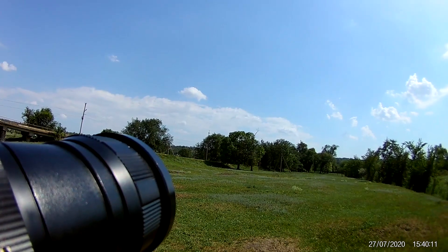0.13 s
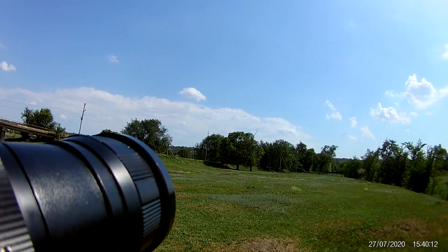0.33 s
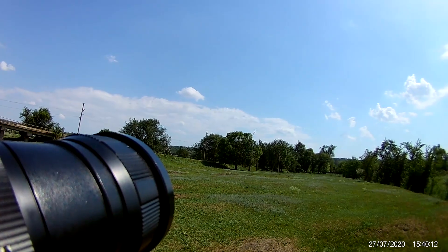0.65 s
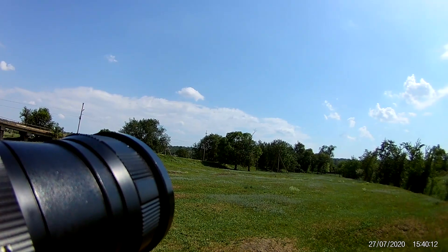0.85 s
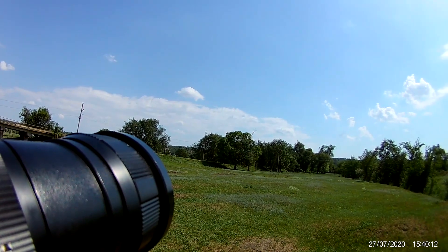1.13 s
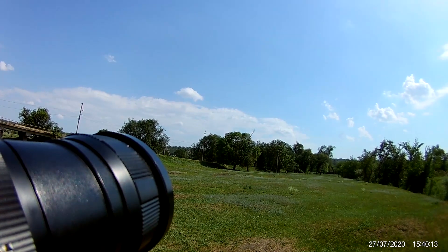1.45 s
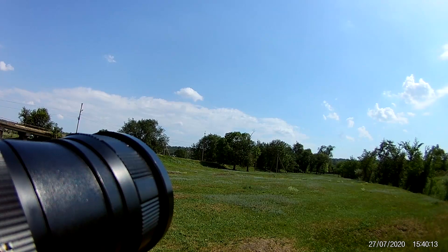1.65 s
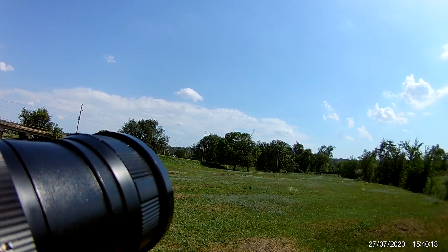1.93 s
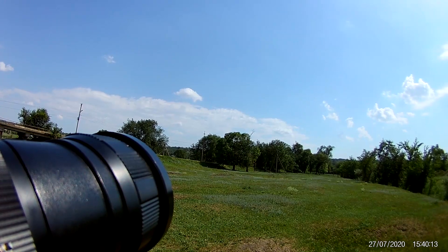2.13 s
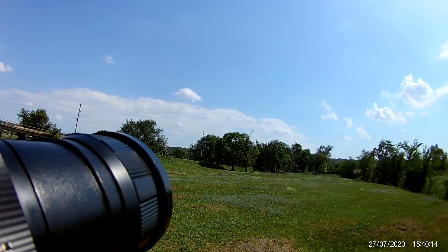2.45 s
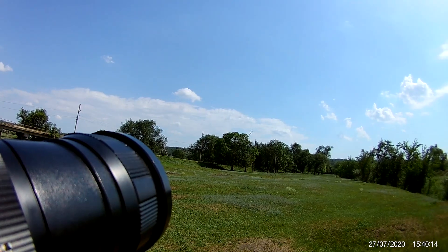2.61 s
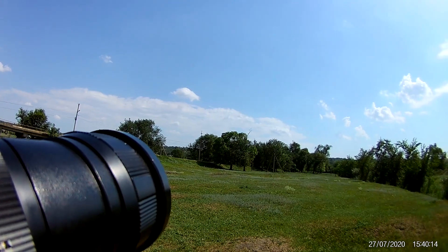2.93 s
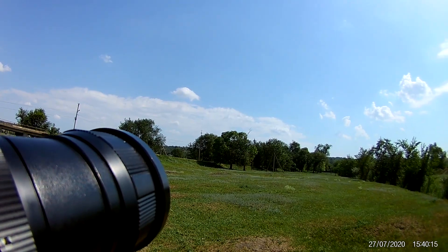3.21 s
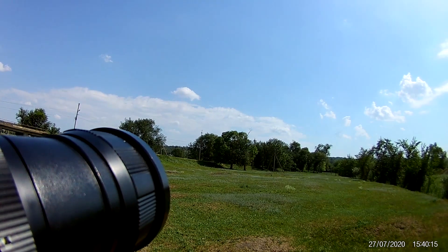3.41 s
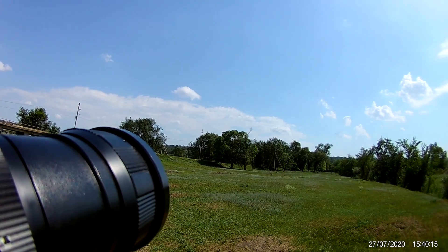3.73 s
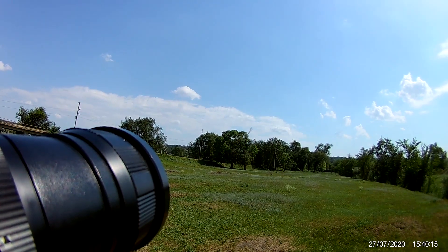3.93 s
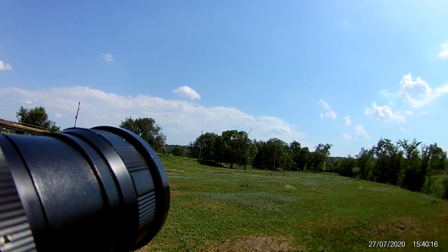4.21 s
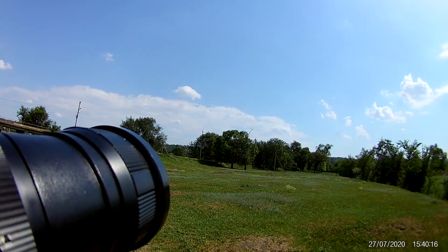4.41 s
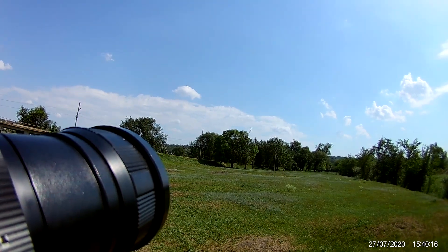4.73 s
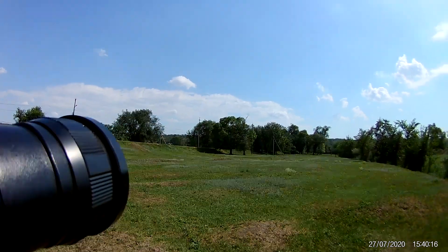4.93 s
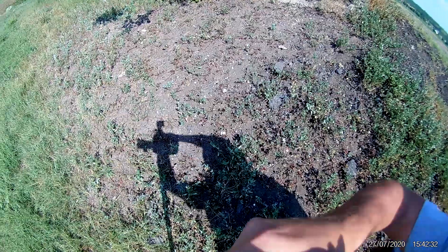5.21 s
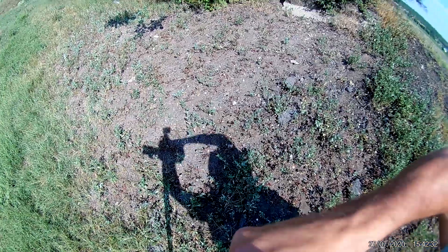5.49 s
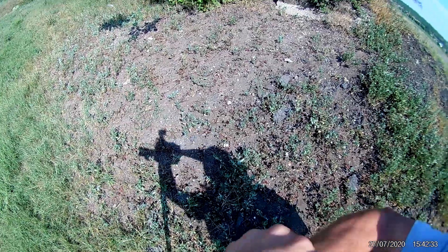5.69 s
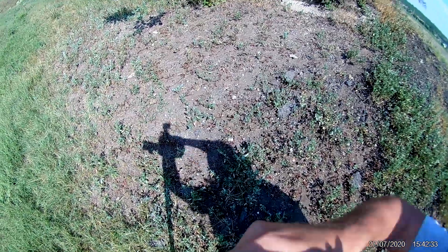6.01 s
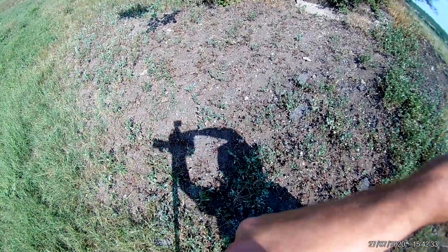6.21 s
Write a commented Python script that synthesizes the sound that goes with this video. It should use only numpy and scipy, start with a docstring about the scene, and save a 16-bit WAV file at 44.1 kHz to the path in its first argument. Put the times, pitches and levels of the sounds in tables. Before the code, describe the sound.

In a quiet open field, very close to the microphone, a few light lever clicks start a clockwork film camera. It whirrs with a fast, rough metallic clatter and faint gear whine for over three seconds, then stops dead with a hard clack and small trailing clicks. A low breeze rumbles gently. Abruptly, hands rub and bump the camera, a quick ratchet runs, and sharp metal snaps follow.

```python
"""A clockwork film camera, close to the microphone, in an open field with a light breeze.
The release is pressed, the motor whirrs at about 24 frames a second and is stopped dead by its latch:
contacts in every frame, rough gear teeth and a scraping governor excite the metal housing; gears sing.
Then the camera is handled and wound: rubbing and bumps, a run of ratchet teeth, sharp snaps of the key.
The breeze is shaped noise with gusts, over the faint hiss of the field."""
import sys
import numpy as np
from scipy import signal
from scipy.fft import rfft, irfft, next_fast_len
from scipy.io import wavfile

SR = 44100
rng = np.random.default_rng(int(sys.argv[2]) if len(sys.argv) > 2 else 0)


def transcribe(signal):
    """Save signal, clipped to [-1, 1], as a 16-bit WAV file at the path in sys.argv[1]."""
    frames = np.atleast_2d(signal).T
    limited = np.clip(frames, -1, 1)
    pcm = np.round(limited * 32767).astype(np.int16)
    wavfile.write(sys.argv[1], SR, pcm)


N = 280035  # length in samples

# broad spectrum of the metal housing: (frequency [Hz], level [dB])
HOUSING = [(130, -31), (210, -15.5), (290, -21.5), (400, -8.5), (700, -8.5), (1400, -9), (2000, -5),
           (3400, -6), (3700, -10.5), (4500, -13), (5500, -10.5), (8400, -10), (9400, -18.5),
           (10700, -28.5), (15500, -34.5)]
# resonances and antiresonances of the housing: (frequency [Hz], width [Hz], gain [dB])
HOUSING_MODES = [(468, 80, 2), (735, 50, -7), (1165, 70, 7), (1570, 30, -7), (1800, 90, 3), (2070, 60, -4),
                 (2180, 130, 6), (2350, 160, 4), (2560, 120, 4), (2700, 120, -5), (2890, 110, 5),
                 (2990, 70, -6), (3150, 200, 6), (3370, 190, 6), (3630, 100, -4), (4480, 200, -4),
                 (5200, 300, -3), (5640, 200, 4), (6100, 200, -5), (6400, 300, 3), (8220, 400, 4),
                 (8550, 250, -4)]
# the claw bites hardest at the start of each sprocket turn
FRAMES_PER_TURN = 4


def from_db(db):
    """Amplitude factor of a level in dB."""
    return 10 ** (np.asarray(db) / 20)


def rms_one(x):
    """Scale to an rms of 1."""
    return x / np.sqrt(np.mean(x ** 2) + 1e-20)


def at_hz(points, hz):
    """Read a spectrum on a log-frequency axis."""
    known_hz, db = np.transpose(points)
    return np.interp(np.log(np.maximum(hz, 1)), np.log(known_hz), db)


def drift(rate_hz):
    """Slow random wander of rms 1: noise through a double low-pass, computed at every tenth sample."""
    pole = np.exp(-20 * np.pi * rate_hz / SR)
    raw = rng.standard_normal(N // 10 + 4002)
    slow = signal.lfilter([1], [1, -2 * pole, pole * pole], raw)[4000:]  # settled part
    return np.interp(np.arange(N) / 10, np.arange(len(slow)), rms_one(slow))


def colour(x, spectrum, modes=(), tilt_db=0):
    """Minimum-phase filter: a broad spectrum, resonant peaks, a tilt per octave from 500 to 8000 Hz."""
    size = 8192
    hz = np.maximum(np.fft.rfftfreq(size, 1 / SR), 1)
    db = at_hz(spectrum, hz) + tilt_db * np.log2(np.clip(hz, 500, 8000) / 3000)
    for centre_hz, width_hz, gain_db in modes:
        db = db + gain_db / (1 + (2 * (hz - centre_hz) / width_hz) ** 2)
    # folding the cepstrum onto positive times makes the response causal
    cepstrum = irfft(np.log(from_db(db)))
    cepstrum[1:size // 2] *= 2
    cepstrum[size // 2 + 1:] = 0
    response = irfft(np.exp(rfft(cepstrum)))
    return signal.fftconvolve(x, response)[:len(x)]


def noise(spectrum):
    """Steady noise of the given spectrum, rms 1."""
    return rms_one(colour(rng.standard_normal(N), spectrum))


def grains(per_s, spread_db):
    """Tiny contacts at random moments, of uneven size; rms 1."""
    sizes = from_db(spread_db * np.minimum(rng.exponential(1, N), 4))
    signed = sizes * rng.choice([-1, 1], N)
    return rms_one(signed * (rng.random(N) < per_s / SR))


def blow(t60, rise_s, crack_db=-60, crack_s=0.001):
    """A first crack on a burst of tiny contacts that builds within an instant and dies away."""
    t = np.arange(SR // 10) / SR
    burst = (1 - np.exp(-t / rise_s)) * np.exp(-np.log(1000) * t / t60)
    crack = from_db(crack_db) * np.exp(-t / crack_s)
    return (burst + crack) * rng.choice([-1, 1], len(t))


def add(out, s, db, sound):
    """Lay a sound in at time s with its peak at db."""
    start = int(s * SR)
    part = sound[:N - start]
    out[start:start + len(part)] += from_db(db) * part / np.abs(part).max()


def outdoors():
    """One wind drives a deep surge, a rumble and a higher buffeting, each with its own eddies, over hiss."""
    # strength of the breeze on the microphone: (time [s], level [dB])
    breeze = [(0, -65), (2.63, -65), (2.78, -51.5), (3.48, -52.5), (4.15, -48.5), (4.45, -51), (4.8, -46),
              (5.05, -50.5), (5.14, -56.5), (5.3, -49), (5.5, -57), (5.65, -51.5), (6.1, -50),
              (6.35, -55.5)]
    # gusts: (time of the peak [s], rise above the breeze [dB])
    gusts = [(.14, 3.5), (.74, 2.5), (1.3, 4), (1.951, 5), (2.48, 8), (2.88, 1), (3.011, 2), (3.7, 8),
             (4.0, 7.5), (4.11, 4.5), (4.61, 1.5), (5.66, 6.5), (5.87, 6.5)]
    # spectra of the surge, rumble and buffeting: (frequency [Hz], level [dB])
    surge = [(10, -14), (20, 10.5), (42, 2), (55, 9), (90, -50)]
    rumble = [(30, -37), (52, -3.5), (72, 6.5), (105, -3.5), (140, -7.5), (250, -76.5)]
    buffet = [(60, -22.5), (110, -1), (160, -1.5), (240, -10.5), (350, -20), (600, -27.5), (1500, -67)]
    # hiss of the still field: (frequency [Hz], level [dB])
    field = [(180, -23.5), (300, -6), (404, -10.5), (431, -10.5), (526, -12), (835, -13.5), (1020, -16),
             (1300, -15.5), (5850, -26), (15500, -38.5)]
    gust_s = 0.047  # from the peak until the rise in dB has shrunk to 1/e

    t = np.arange(N) / SR
    times, levels_db = np.transpose(breeze)
    wind_db = np.interp(t, times, levels_db)
    for s, db in gusts:
        wind_db += db * np.exp(-((t - s) / gust_s) ** 2)

    out = from_db(-63.5) * noise(field)
    for spectrum, db, eddy_db in ((surge, -7.0, 3.5), (rumble, 2.0, 2.0), (buffet, -2.0, 2.0)):
        eddies_db = eddy_db * drift(rate_hz=4.5)
        out += from_db(wind_db + db + eddies_db) * noise(spectrum)
    return out


def strokes_of_hand():
    """Each stroke of the hand rubs over the camera, in tiny uneven contacts, and sways it at low pitch."""
    # strokes: (start [s], length [s], level [dB])
    strokes = [(5.14, 0.081, -56.5), (5.213, 0.044, -54.5), (5.278, 0.11, -56), (5.47, 0.13, -55),
               (5.603, 0.1, -51.5), (5.736, 0.054, -57.5), (5.854, 0.02, -53), (5.952, 0.084, -49.5),
               (6.074, .27, -56)]
    # spectrum of the rubbing: (frequency [Hz], level [dB])
    rubbing_spectrum = [(180, -16), (300, 1), (616, -3), (763, -8), (1420, -4.5), (1970, -8), (2970, -11.5),
                        (5260, -25), (7540, -27), (8460, -23), (15000, -36)]
    # spectrum of the sway: (frequency [Hz], level [dB])
    sway_spectrum = [(10, -14), (20, 10.5), (42, 2), (55, 9), (90, -50)]
    attack_s, release_s = 0.023, 0.03

    t = np.arange(N) / SR
    pressure = np.zeros(N)
    for s, length, db in strokes:
        press = np.clip((t - s) / attack_s, 0, 1)
        let_go = np.exp(-np.maximum(t - s - length, 0) / release_s)
        pressure += from_db(db) * press * let_go

    unevenness = from_db(1.5 * drift(rate_hz=43))
    contacts = grains(per_s=2600, spread_db=2.5) * unevenness
    rubbing = rms_one(colour(contacts, rubbing_spectrum))
    return pressure * (rubbing + noise(sway_spectrum))


def bumps_on_body():
    """Each bump against the body is a low decaying sine, the thud, and a short burst, the scuff."""
    # bumps: (time [s], thud level [dB], thud frequency [Hz], thud t60 [s], scuff level [dB])
    bumps = [(5.225, -33, 302, 0.023, -33), (5.237, -30, 49.7, 0.1, -40), (5.6, -30.5, 130, 0.044, -43),
             (5.618, -35, 42, 0.13, -45), (5.739, -53, 199, .05, -37.5), (5.861, -44, 79, 0.11, -52),
             (5.974, -45, 150, .04, -35.5), (6.03, -34.5, 65, 0.082, -36.5)]
    # spectrum of the scuffs: (frequency [Hz], level [dB])
    scuff = [(100, -6.5), (350, 0), (800, -5), (1400, -3), (2200, -10), (3500, -45), (12000, -56)]

    out, t = np.zeros(N), np.arange(SR // 2) / SR
    for s, db, hz, t60, scuff_db in bumps:
        thud = -np.sin(2 * np.pi * hz * t) * np.exp(-np.log(1000) * t / t60)
        add(out, s, db, thud)
        add(out, s, scuff_db, colour(blow(t60=0.052, rise_s=0.0013), scuff))
    return out


def ratchet():
    """The pawl ticks twice a tooth, lifting and dropping, and rasps as it slides."""
    # ratchet teeth while winding: (time [s], level [dB])
    teeth = [(5.39, -36), (5.449, -34.5), (5.473, -31.5), (5.492, -30.5), (5.510, -30), (5.528, -28.5),
             (5.549, -29), (5.572, -30), (5.598, -31), (5.625, -34.5), (5.66, -37), (5.739, -32.5)]
    # spectrum of the pawl: (frequency [Hz], level [dB])
    pawl = [(600, -16), (1500, -8), (2400, -7.5), (3000, 3), (3800, -4), (4500, -2.5), (5600, -4.5),
            (6300, -9), (7600, -1), (8800, -1.5), (10200, -4), (11200, -7), (12300, -8), (15500, -21)]
    lead_s, lift_db = 0.0055, -7.0  # the lift comes before the drop and is softer
    rasp_s, rasp_db = 0.01, -19.5

    out, t = np.zeros(N), np.arange(N) / SR
    sliding = np.zeros(N)
    for s, db in teeth:
        add(out, s - lead_s, db + lift_db, colour(blow(t60=0.009, rise_s=0.00038), pawl))
        add(out, s, db, colour(blow(t60=0.009, rise_s=0.00038), pawl))
        sliding += from_db(db + rasp_db) * np.exp(-((t - s) / rasp_s) ** 2)
    rasp = rms_one(colour(grains(per_s=2000, spread_db=3.5), pawl, tilt_db=-5.5))
    return out + sliding * rasp


def key_snaps():
    """The winding key snaps sharply, after a very faint soft rise, and the housing rings on."""
    # snaps: (time [s], level [dB], brightness [dB per octave], t60 [s])
    snaps = [(5.840, -12, 4.5, 0.0096), (5.861, -29.5, -3.5, 0.02), (5.9344, -12.5, 0, 0.0089),
             (5.94, -22, -0.5, 0.012), (5.987, -37, -12, .012), (6.02, -23.5, 4, .008),
             (6.073, -31, -5.5, .015), (6.0925, -18, 6, 0.012), (6.295, -37.5, -7, .015),
             (6.34, -37, -4.5, .015)]
    # broad spectrum of the key: (frequency [Hz], level [dB])
    key = [(300, -2.5), (900, 0), (2000, -8.5), (4000, -7.5), (6000, -8), (7000, -2), (10000, -2),
           (12000, -8.5), (13500, -11), (15500, -29)]
    # resonances of the key: (frequency [Hz], width [Hz], gain [dB])
    key_modes = [(1530, 340, 10.5), (2960, 640, 15.5), (4670, 400, 10), (6400, 690, -0.5), (7000, 550, 3),
                 (10300, 1200, 5)]
    lead_s, lead_db = 0.0035, -31.0  # the soft rise: time before the snap, level against it
    after_db = -22.0  # ring of the housing against the snap

    out = np.zeros(N)
    for s, db, tilt_db, t60 in snaps:
        rise = blow(t60, rise_s=0.001)
        add(out, s - lead_s, db + lead_db, colour(rise, key, key_modes, tilt_db))
        snap = blow(t60, rise_s=0.00028, crack_db=16.5, crack_s=0.00068)
        add(out, s, db, colour(snap, key, key_modes, tilt_db))
        ring = blow(t60=0.046, rise_s=0.00066)
        add(out, s, db + after_db, colour(ring, HOUSING, HOUSING_MODES))
    return out


def latch():
    """Levers of release and stop click against the housing, each with a faint soft onset and a broad ring."""
    # clicks of the levers: (time [s], level [dB], brightness [dB per octave])
    clicks = [(0.55, -46, 0.5), (.678, -44.5, 3), (.712, -40, -2), (.726, -40, -2), (.743, -42.5, 9),
              (.779, -27.5, 3), (.804, -33, -2), (.825, -40, 4), (.874, -27, -2), (0.886, -25, 17),
              (.926, -23.5, 14), (0.938, -23, 7), (4.222, -25, 4), (4.231, -28, 11), (4.236, -16.5, 7),
              (4.243, -20, .3), (4.246, -16.5, -1), (4.278, -22.5, 0), (4.302, -24, -1.8), (4.315, -33, 0),
              (4.358, -39, 1), (4.363, -29.5, -0.5), (4.413, -44, 2), (4.424, -43, 2), (4.452, -37.5, 1),
              (4.515, -37, 3.5), (4.547, -35.5, 1.3)]
    lever_t60_s = 0.019
    lead_s, lead_db = 0.0039, -19.0  # soft onset before the click

    out = np.zeros(N)
    modes = [*HOUSING_MODES, (2280, 330, 3.5)]  # every lever rings alike: Hz, width Hz, dB
    for s, db, tilt_db in clicks:
        onset = blow(lever_t60_s, rise_s=0.001)
        add(out, s - lead_s, db + lead_db, colour(onset, HOUSING, modes, tilt_db))
        click = blow(lever_t60_s, rise_s=0.00018, crack_db=-3)
        add(out, s, db, colour(click, HOUSING, modes, tilt_db))
    return out


def pace():
    """Share of full speed: a ramp after the release, a quick decay once the latch drops."""
    release_s, spin_up_s, stop_s, coast_s = 0.795, 0.15, 4.255, 0.051
    t = np.arange(N) / SR
    spin_up = np.clip((t - release_s) / spin_up_s, 0, 1)
    coast = np.exp(-np.maximum(t - stop_s, 0) / coast_s)
    return spin_up * coast


def frame_count():
    """Running count of film frames; the speed sinks towards the governor's lowest as the spring unwinds."""
    full_fps, spent_fps, run_down_s = 24.70, 23.121, 5.39  # frames per s, and time constant
    first_stroke_s = 1.096  # a claw stroke, from which the frames are counted
    t = np.arange(N) / SR - first_stroke_s
    speed_fps = pace() * (spent_fps + (full_fps - spent_fps) * np.exp(-t / run_down_s))
    count = np.cumsum(speed_fps) / SR
    return count - count[int(first_stroke_s * SR)]


def touches(frames, places, sizes):
    """A click of the given size whenever the works pass one of the places, counted in frames."""
    passed = (places > frames[0]) & (places < frames[-1])
    return np.bincount(np.searchsorted(frames, places[passed]), sizes[passed], N)


def gear_teeth(frames, turns, count=450):
    """The same rough teeth touch again in every turn, a little early or late; rms 1 while running."""
    spread_db, slop_frames, uneven_db = 2.5, 0.002, 1.0
    places = rng.uniform(0, FRAMES_PER_TURN, count)
    polarity = rng.choice([-1, 1], count)
    sizes = polarity * from_db(spread_db * np.minimum(rng.exponential(1, count), 3))
    late, stronger = rng.standard_normal((2, len(turns), count))
    passing = turns[:, None] + places + slop_frames * late
    teeth = touches(frames, passing, sizes * from_db(uneven_db * stronger))
    return teeth / np.std(teeth[pace() == 1])


def frame_knocks(frames, numbers):
    """Claw, shutter and sprocket knock in every frame; the claw bites less with each frame of a turn."""
    # contacts within every frame, the claw first: (place [share of the frame], level [dB])
    contacts = [(0, 2.5), (.2, 3), (.39, -3.5), (.61, 0), (.81, -3)]
    jitter_frames, uneven_db = 0.006, 2.0
    bite_db = 4.5 * 0.58 ** (numbers % FRAMES_PER_TURN)  # extra level of the claw

    knocks = np.zeros(N)
    for k, (place, db) in enumerate(contacts):
        late, stronger = rng.standard_normal((2, len(numbers)))
        knock_db = db + (k == 0) * bite_db + uneven_db * stronger
        knocks += touches(frames, numbers + place + jitter_frames * late, from_db(knock_db))
    return knocks


def clatter(frames):
    """Frame knocks, gear teeth and the scraping governor shake the housing; rms 1 at full pace."""
    chatter_s, teeth_db, scrape_db, crack_db = 0.0014, -4.0, -7.0, 4.5
    numbers = np.arange(-8, 84)  # frames on either side of the counted stroke
    knocks = frame_knocks(frames, numbers)
    # every knock chatters on for a moment
    decay = np.exp(-1 / (chatter_s * SR))
    chatter = signal.lfilter([1], [1, -decay], knocks + 1e-18)
    force = chatter * rng.choice([-1, 1], N)
    force += from_db(teeth_db) * gear_teeth(frames, numbers[::FRAMES_PER_TURN])
    force += from_db(scrape_db) * grains(per_s=6000, spread_db=4.0)
    # the first touch of metal on metal is harder and brighter than the chatter
    first_touch = from_db(crack_db) * knocks * rng.choice([-1, 1], N)
    cracks = colour(first_touch, HOUSING, HOUSING_MODES, tilt_db=1.0)
    body = colour(force, HOUSING, HOUSING_MODES) + cracks
    return body / np.std(body[pace() == 1])


def whine(frames):
    """Meshing teeth sing at fixed multiples of the frame rate; backlash blurs the lines."""
    # gear whine: (pitch [cycles per frame], level [dB], phase wander [rad])
    gears = [(15.5, -65, .2), (16.5, -57, .2), (19.25, -51.5, .15), (20, -63, .15), (20.25, -63, .2),
             (22, -62.5, .2), (24, -55.5, .15), (47, -58, .4), (48, -50.3, .25), (48.75, -59.5, .4),
             (49, -57.5, .4), (58, -62, .3), (66, -58, .3), (67, -60, .3), (88, -56, .3), (96, -53.5, .35),
             (138, -52, .35)]
    out = np.zeros(N)
    for order, db, wander in gears:
        phase = 2 * np.pi * order * frames + wander * drift(rate_hz=14)
        out += np.sqrt(2) * from_db(db) * np.sin(phase)
    return out


def motor():
    """The clatter grows with speed; the gears sing only near full speed."""
    frames, share = frame_count(), pace()
    clattering = from_db(-34.0) * share ** 1.13 * clatter(frames)
    singing = from_db(-0.03) * share ** 2.0 * whine(frames)
    return clattering + singing


def scene():
    """The left channel leads the right by about a sample in the treble; lower sounds sit in the centre."""
    # difference between the channels: (frequency [Hz], side against mid [dB])
    width_table = [(60, -80), (160, -60), (400, -46.5), (750, -28), (1400, -54), (2100, -18), (3300, -12.5),
                   (5500, -7.5), (9000, -2.5), (15500, 5)]
    background = outdoors() + strokes_of_hand() + bumps_on_body()
    mid = background + ratchet() + key_snaps() + latch() + motor()
    size = next_fast_len(N + SR)
    width = from_db(at_hz(width_table, np.fft.rfftfreq(size, 1 / SR)))
    # the side is the mid turned by a quarter cycle
    side = irfft(1j * width * rfft(mid, size), size)[:N]
    return np.array([mid + side, mid - side])


def record(dry):
    """A steep elliptic low-pass cuts the top above 15.9 kHz."""
    low_pass = signal.ellip(12, .1, 80, 15900, fs=SR, output="sos")
    return signal.sosfilt(low_pass, dry)


dry = scene()
out = record(dry)
transcribe(out)
```